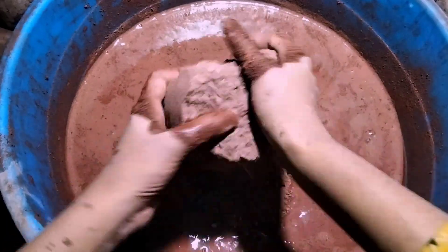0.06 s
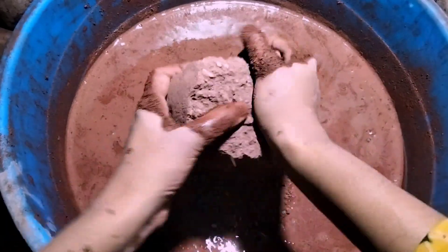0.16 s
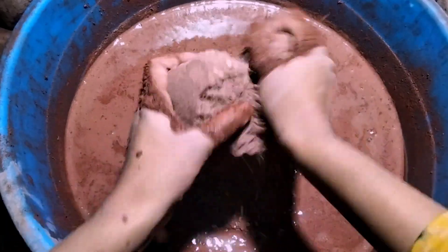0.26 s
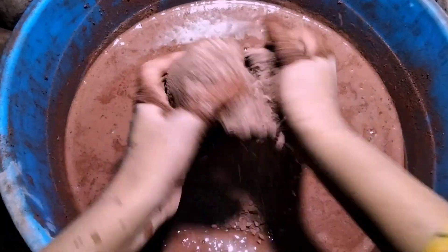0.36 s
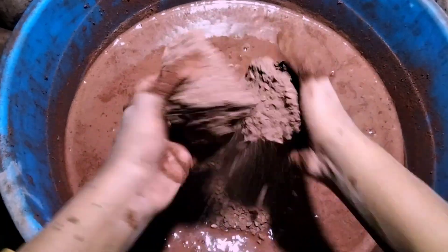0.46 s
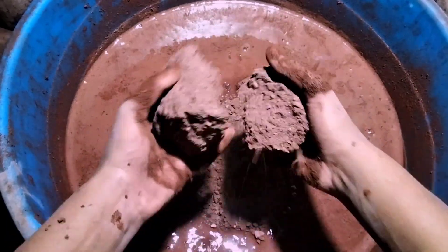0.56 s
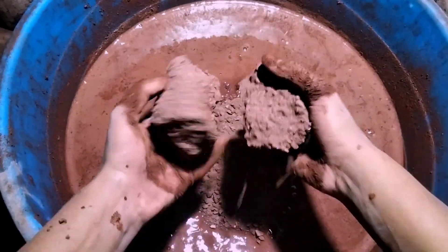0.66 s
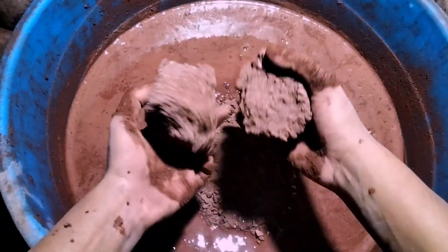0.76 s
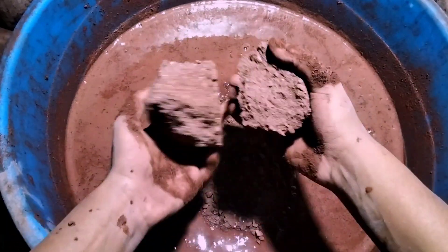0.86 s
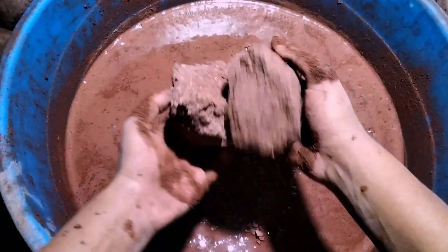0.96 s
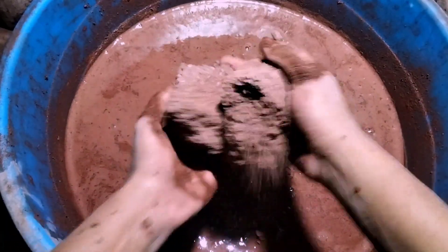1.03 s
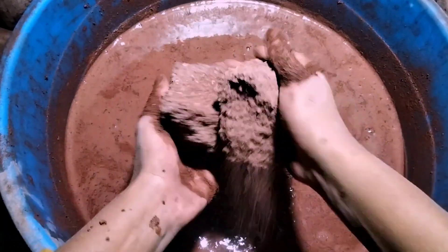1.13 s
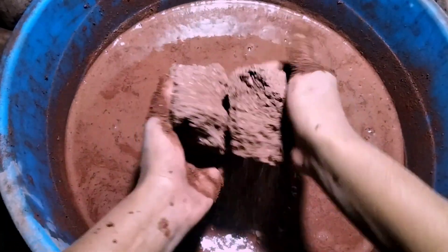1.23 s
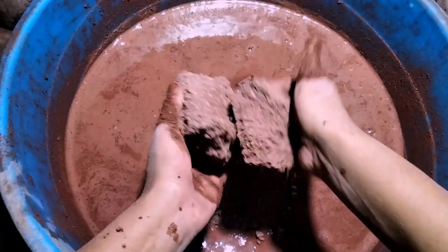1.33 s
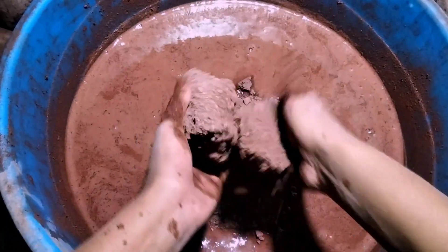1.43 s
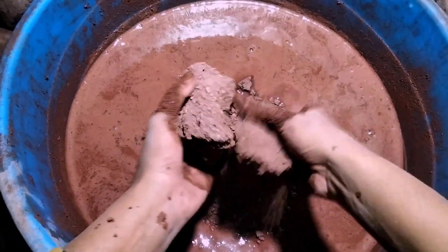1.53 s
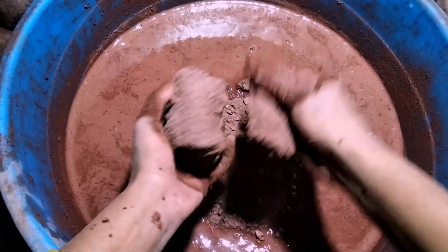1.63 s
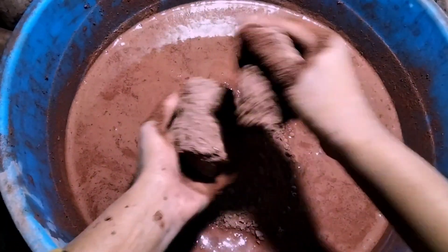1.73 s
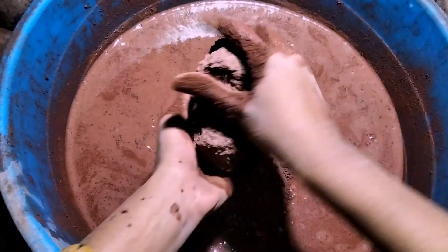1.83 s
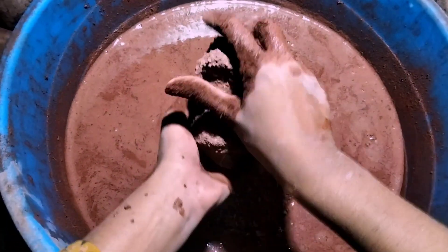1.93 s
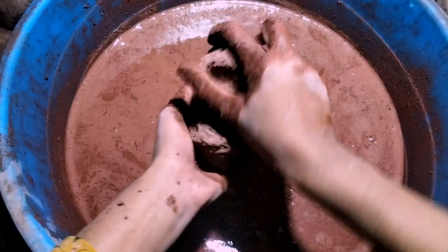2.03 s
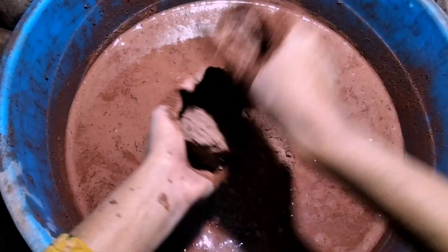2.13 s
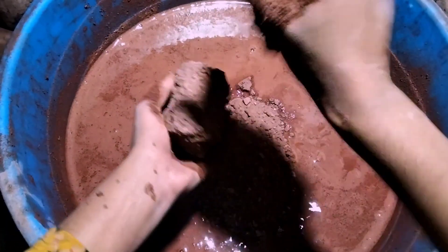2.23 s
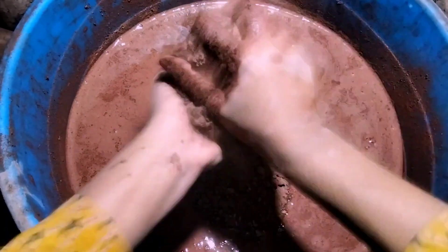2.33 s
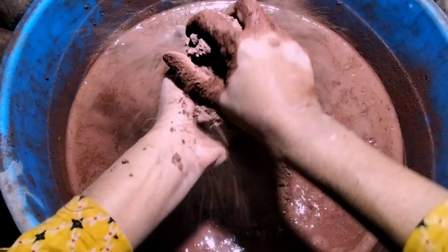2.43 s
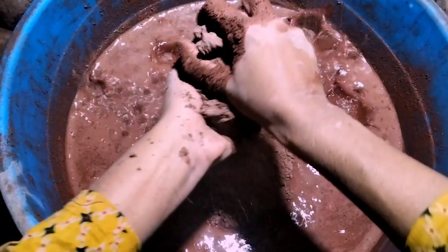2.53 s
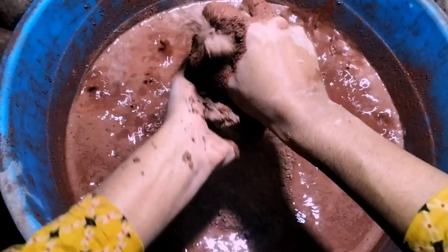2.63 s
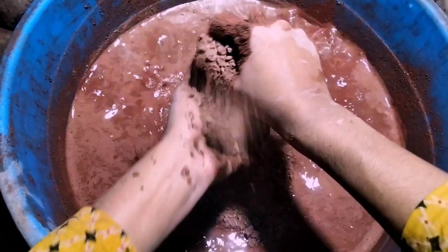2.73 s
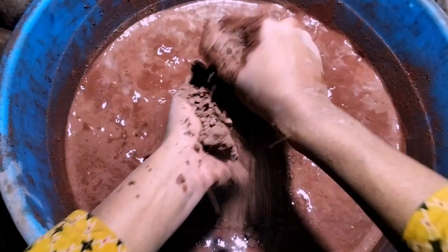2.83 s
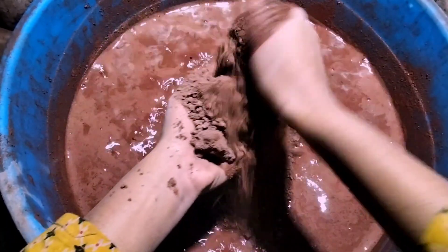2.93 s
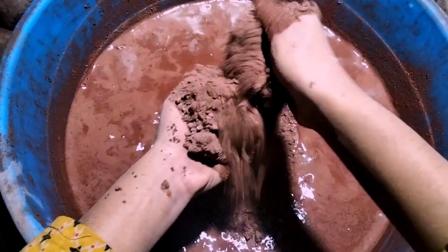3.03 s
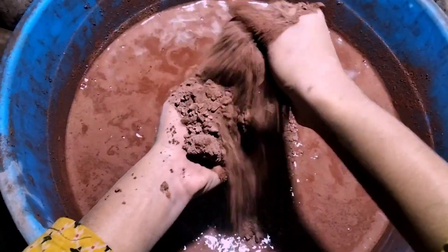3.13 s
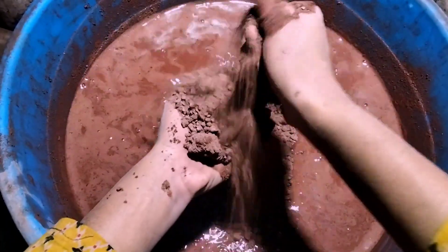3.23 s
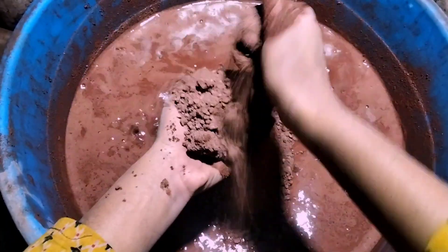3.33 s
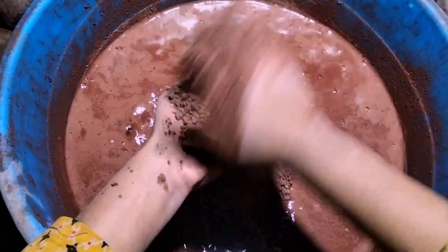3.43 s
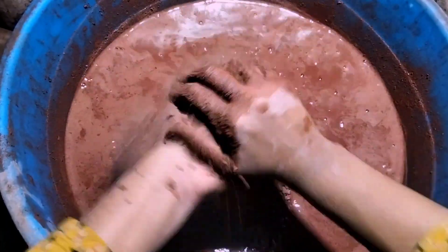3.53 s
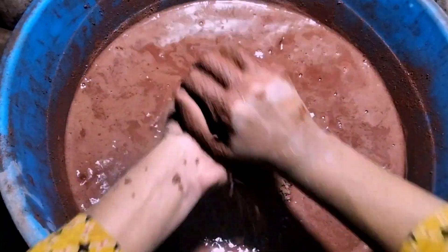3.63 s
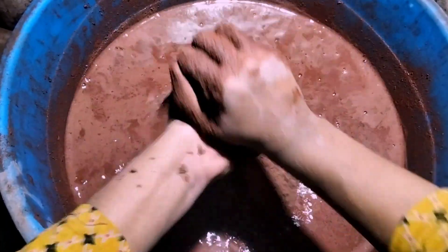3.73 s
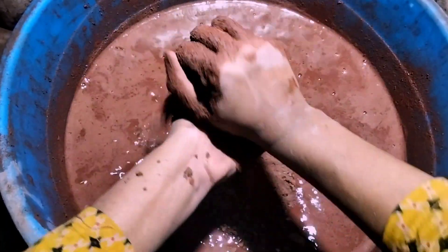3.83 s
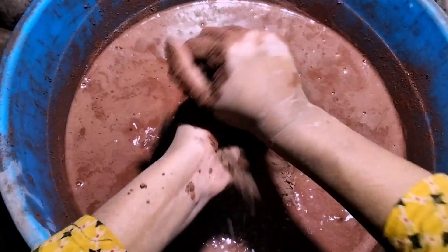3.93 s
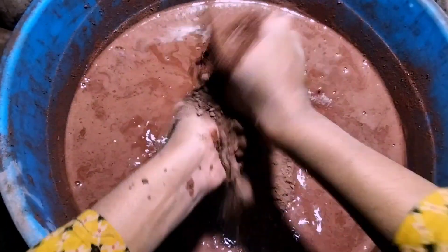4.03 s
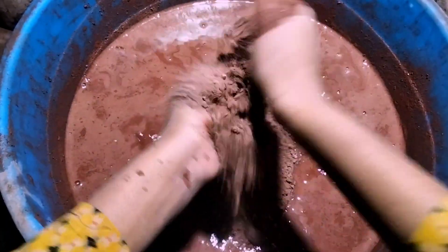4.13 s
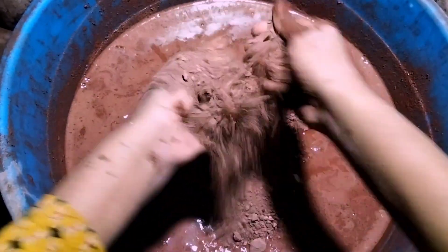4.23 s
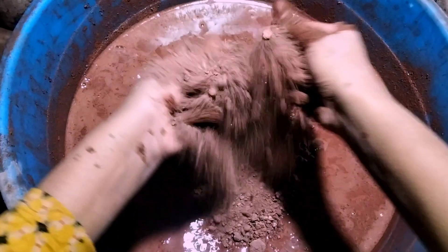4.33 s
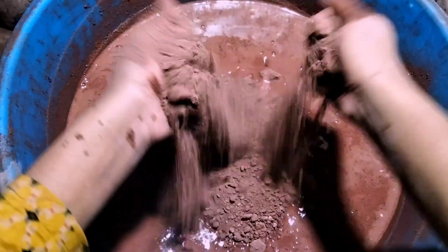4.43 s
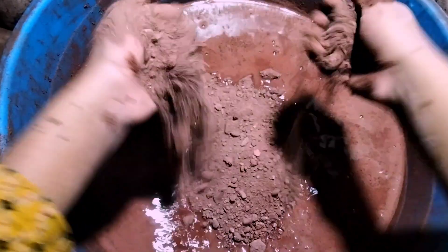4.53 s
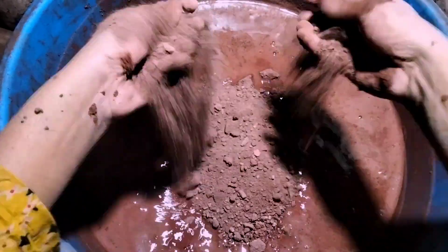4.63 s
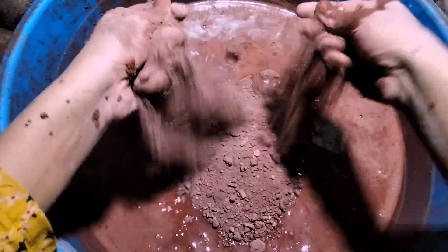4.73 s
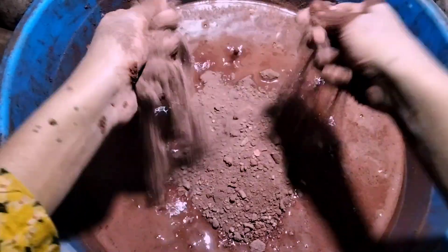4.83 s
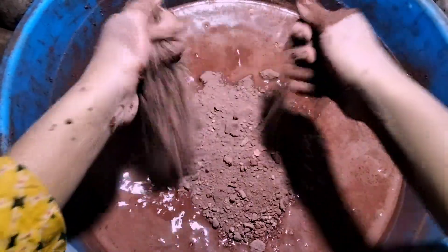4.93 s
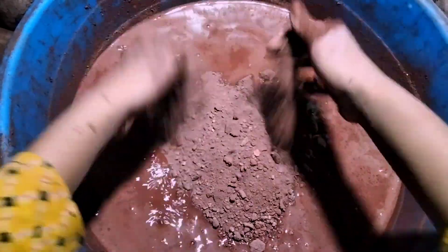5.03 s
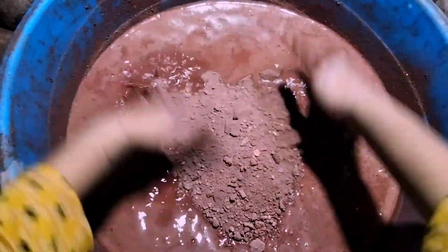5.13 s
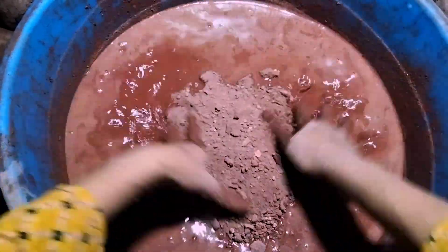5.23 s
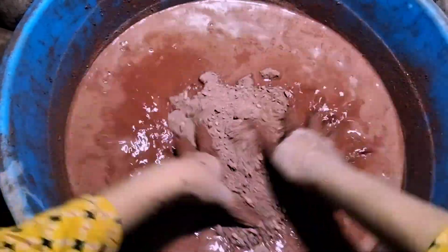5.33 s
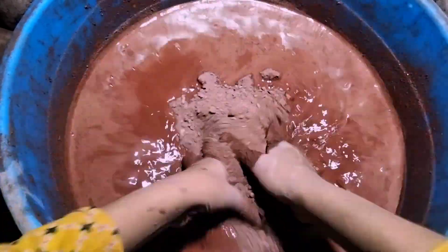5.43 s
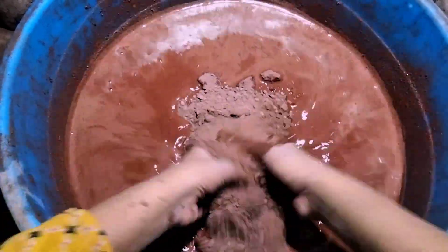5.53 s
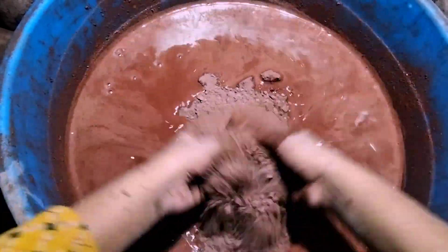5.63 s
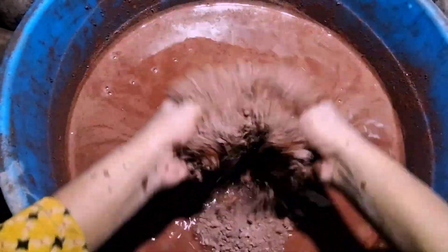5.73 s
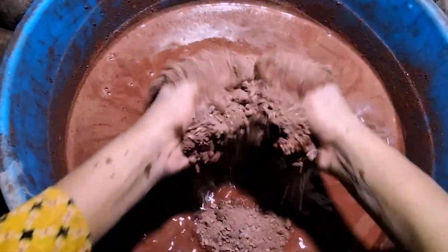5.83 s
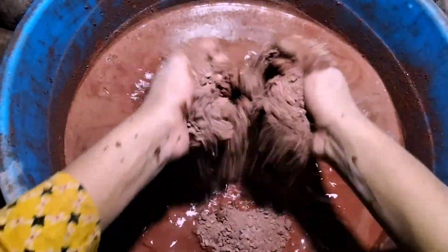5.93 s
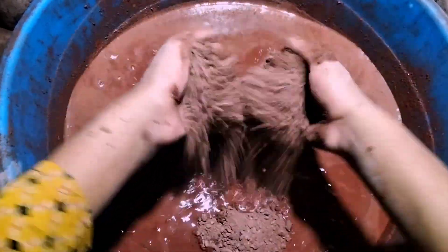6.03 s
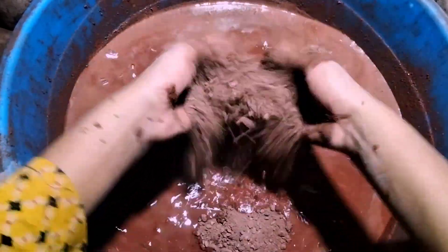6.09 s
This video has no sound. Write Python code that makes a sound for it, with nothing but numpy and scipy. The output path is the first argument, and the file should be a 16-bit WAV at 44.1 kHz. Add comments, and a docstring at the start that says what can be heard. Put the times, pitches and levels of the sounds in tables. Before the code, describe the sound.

A closely miked tub of muddy water. Quiet dry crunching of clods comes first, with grain clicks and light knocks. Around the middle, one hard knock and a loud cluster of snaps and splashes breaks out. Crackling turns brighter and busier as crumbs sprinkle and plop into water, followed by a gentle slosh, a brief falling hiss, and a swelling gritty pour.

```python
"""Crumbling damp dirt over a tub of water

Grains crackle as filtered random impulses; hard grains click, lumps crunch, and one clod thuds on another.
Pieces splash in as bursts of bubbles and spray; crumbs plop as single ringing air pockets.
Bubble swarms and wet grit slosh, and a scoop hisses with a falling note.
Tub resonances and echoes colour dirt and water; trickles, knocks and a low room rumble are added dry."""
import sys
import numpy as np
from scipy import signal
from scipy.io import wavfile

SR = 44100
rng = np.random.default_rng(int(sys.argv[2]) if len(sys.argv) > 2 else 0)


def output_pcm(signal):
    """Save a mono or channel-first signal as 16-bit PCM at the path in sys.argv[1].

    Samples are clipped to [-1, 1] before scaling.
    """
    pcm = np.clip(np.atleast_2d(signal).T, -1, 1) * 32767
    wavfile.write(sys.argv[1], SR, np.round(pcm).astype(np.int16))


N = 271656
TIME_S = np.arange(N) / SR
AFLOAT_S = 2.5  # from here on, crumbs fall into the water

# spectrum of grains showering the water, and of spray: freq_hz, relative level_db (per Hz)
GRIT_SPECTRUM = [(100, -15), (350, -12.5), (800, -28), (2000, -51), (3500, -22), (5000, -12.5), (7000, -8),
                 (8500, -0.5), (9600, 1.5), (11000, -9.5), (13000, -16.5), (15500, -29)]
# spectrum of a dull grain body or a water slap: freq_hz, relative level_db (per Hz)
BODY_SPECTRUM = [(200, -53), (900, -4.5), (2000, 4), (3300, 6), (5000, -3.5), (8000, -2), (16000, -100)]


def amp(db):
    """Converts dB to linear gain."""
    return 10 ** (np.asarray(db) / 20)


def unit(x):
    """Scales to an rms of one."""
    return x / np.sqrt(np.mean(x ** 2) + 1e-20)


def decay(t, t60_s):
    """Exponential decay, 60 dB down after t60_s."""
    return np.exp(-np.log(1000) * t / t60_s)


def add(mix, start_s, sound):
    """Adds a sound into the mix from start_s."""
    part = mix[max(round(start_s * SR), 0):][:len(sound)]
    part += sound[:len(part)]


def follow(table, axis=1):
    """Gain over time, interpolated in dB from one column of a table."""
    rows = np.array(table)
    return amp(np.interp(TIME_S, rows[:, 0], rows[:, axis]))


def click(spectrum, size=2048):
    """Minimum-phase click of the given spectrum, with a peak of one."""
    freq_hz, level_db = np.transpose(spectrum)
    bin_hz = abs(np.fft.fftfreq(size, 1 / SR))
    log_gain = np.log(amp(np.interp(np.log(bin_hz + 1), np.log(freq_hz), level_db)))
    # the Hilbert transform of log gain gives the minimum phase
    response = np.exp(np.conj(signal.hilbert(log_gain)))
    wave = np.fft.ifft(response).real[:size // 2]
    return wave / abs(wave).max()


def colour(x, spectrum):
    """Filters x to a spectrum."""
    return signal.oaconvolve(x, click(spectrum))[:len(x)]


def impacts(per_s, spread_db, size=N):
    """Random impulses of either sign, most small and a few large."""
    height = amp(spread_db * np.minimum(rng.exponential(1, size), 4))
    sign = rng.choice([-1, 1], size)
    return height * sign * (rng.random(size) < per_s / SR)


def bursts(texture, table, attack_s):
    """Cuts random pieces of a grainy texture into sudden, dying bursts."""
    out = np.zeros(N)
    for start_s, level_db, t60_s in table:
        t = np.arange(int(t60_s * SR) + 2) / SR
        shape = decay(t, t60_s) * (1 - np.exp(-t / attack_s))
        burst = texture[rng.integers(N // 2):][:len(t)] * shape
        # every burst gets the energy of its envelope
        add(out, start_s, amp(level_db) * burst * np.linalg.norm(shape) / np.linalg.norm(burst))
    return out


def grit():
    """Fine grains crackle in the palms, then more brightly over the water; coarse crumbs scrape lower."""
    # spectrum of grains rubbed in the palms: freq_hz, relative level_db (per Hz)
    rubbing_spectrum = [(100, -20), (350, -9), (800, -14), (2000, -28), (3500, -16), (5200, -12.5),
                        (7000, -6.5), (9500, 1), (11300, -4.5), (13000, -10), (15500, -16)]
    # spectrum of coarse crumbs scraping: freq_hz, relative level_db (per Hz)
    scrape_spectrum = [(90, -9.5), (350, 7.5), (800, -10), (2000, 2.5), (3400, -0.5), (5000, -4), (7000, 0),
                       (10000, -7.5), (15000, -23)]
    # loose dirt sliding between squeezes: time_s, fine_db, coarse_db
    slide = [(0.0, -57.5, -57.5), (.72, -57, -60.5), (1.4, -57, -56), (2.24, -63, -63), (2.42, -50.5, -52),
             (2.54, -47, -42), (3.05, -45.5, -49.5), (3.42, -45, -47.5), (3.85, -44.5, -42),
             (4.18, -44.5, -45), (4.92, -41.5, -47.5), (5.17, -47.5, -45), (5.26, -50, -56),
             (5.72, -44, -42), (5.97, -38, -39), (6.16, -35.5, -40)]

    afloat = np.clip((TIME_S - AFLOAT_S) / 0.02, 0, 1)
    grains = crackle(per_s=1500, spread_db=5.0, clump_db=2.0, clump_hz=109, sand_db=0)
    strays = chips(3240, 11200, per_s=420, cycles=9, spread_db=4.5)
    rubbed = unit(colour(grains + amp(-0.5) * strays, rubbing_spectrum))
    shower = unit(colour(grains + amp(-4.5) * strays, GRIT_SPECTRUM))
    fine = (1 - afloat) * rubbed + afloat * shower

    crumbs = crackle(per_s=2400, spread_db=3.5, clump_db=3.0, clump_hz=80, sand_db=-2.5)
    coarse = unit(colour(crumbs, scrape_spectrum))
    fine_gain = np.hypot(grip(), follow(slide))
    coarse_gain = np.hypot(grip(coarse=True), follow(slide, axis=2))
    return fine * fine_gain + coarse * coarse_gain


def crackle(per_s, spread_db, clump_db, clump_hz, sand_db):
    """Grains slip past each other in short clumps, over a whisper of fine sand."""
    lowpass = signal.butter(2, clump_hz, fs=SR, output="sos")
    clumps = unit(signal.sosfilt(lowpass, rng.standard_normal(N)))
    grains = impacts(per_s, spread_db) / np.sqrt(per_s / SR)
    sand = amp(sand_db) * rng.standard_normal(N)
    return unit((grains + sand) * amp(clump_db * clumps))


def chips(low_hz, high_hz, per_s, cycles, spread_db, count=24):
    """Loose grains of many sizes: each clicks for a few cycles at its own pitch."""
    out, t = np.zeros(N), np.arange(SR // 200) / SR
    for pitch_hz in np.geomspace(low_hz, high_hz, count):
        ring = np.sin(2 * np.pi * pitch_hz * t) * decay(t, cycles / pitch_hz)
        out += signal.oaconvolve(impacts(per_s / count, spread_db), ring / np.linalg.norm(ring))[:N]
    return unit(out)


def grip(coarse=False):
    """Gain over time of the finger squeezes, and of one burst of spray: each closes quickly, holds, and its
    grains soon settle."""
    # fingers squeezing or rubbing, and at 2.442 s the spray of pieces splashing in: start_s, length_s,
    # crackle_db, coarse_db (relative to crackle)
    squeezes = [(0.0, 0.058, -50, 4.5), (0.095, 0.12, -49, 2), (0.33, 0.1, -53.5, -1.5),
                (0.441, 0.096, -49, -3), (0.567, 0.036, -49.5, -1), (0.892, 0.087, -53.5, 0.5),
                (1.11, 0.12, -53.5, -10), (1.32, 0.13, -52.5, -3.5), (1.575, 0.11, -58, -3),
                (1.767, 0.032, -44, -0.5), (1.889, 0.14, -56, -2), (2.312, 0.011, -48.5, 9.5),
                (2.385, 0.057, -55, -12), (2.442, 0.075, -38, 6), (2.64, 0.079, -46.5, 5.5),
                (2.79, 0.097, -48, 3), (2.925, 0.022, -45, 3), (3.122, 0.16, -43.5, -5.5),
                (3.526, 0.2, -47.5, 3), (3.99, 0.039, -43, -4), (4.34, .145, -45, -3),
                (4.581, 0.067, -48.5, 5), (4.708, 0.16, -42, -2.5), (4.995, 0.09, -41, -0.5),
                (6.01, 0.054, -42, -3)]
    attack_s, release_s = 0.013, 0.012
    out = np.zeros(N)
    for start_s, length_s, crackle_db, coarse_db in squeezes:
        t = np.arange(int((length_s + 8 * release_s) * SR)) / SR
        rise = np.minimum(t / attack_s, 1)
        fall = np.exp(-np.maximum(t - length_s, 0) / release_s)
        add(out, start_s, amp(crackle_db + coarse * coarse_db) * rise * fall)
    return out


def ticks():
    """A hard grain gives a bright tip over a duller body, and scatters a little dust."""
    # single grains snapping or landing: start_s, level_db, body_db (relative, before the trim)
    hard_grains = [(0.105, -16.5, -17), (0.3269, -26, -14), (0.3627, -17.5, -6), (0.3697, -25, -8),
                   (0.4477, -25, -4), (0.5085, -21, -9), (0.8415, -29, -5), (0.934, -19.5, -12),
                   (1.109, -30.5, 0), (1.2177, -17, -5), (1.2203, -27, -15), (1.253, -29, -2),
                   (1.77, -19, 4.5), (1.917, -24.5, -13), (2.1549, -19, -9.5), (2.188, -30, -10),
                   (2.4394, -12, 1), (2.4474, 0, -2), (2.4535, -8, -10), (2.4721, -2, 4.5),
                   (2.4886, -12, 4), (2.5122, -9, 9), (2.7635, -13, 10), (2.8166, -2.5, -2),
                   (2.8494, -7.5, -1.5), (2.8954, -14.5, 3.5), (2.928, -13, -1.5), (3.1201, -14, -7),
                   (3.141, -15.5, 3), (3.1733, -18.5, -16), (3.2312, -18.5, -16), (3.3249, -20.5, 1.5),
                   (3.5705, -14.5, -8), (3.5773, -15, -19), (3.6281, -16, -3), (3.688, -19, -17),
                   (4.0109, -8, -8), (4.0207, -14, -4), (4.1741, -20, 4), (4.205, -16.5, -6),
                   (4.3502, -15, -4), (4.4579, -12.5, -12), (4.469, -11, -22), (4.484, -8, -2.5),
                   (4.627, -12.5, -2), (4.6329, -14.5, 1), (4.7093, -13, -9), (4.7743, -17, -1.5),
                   (4.826, -19, -13), (4.8367, -21.5, -3), (4.949, -17.5, -21), (5.0563, -16.5, -4),
                   (5.6852, -17, -26), (6.0677, -14, -11)]
    # spectrum of the bright tip: freq_hz, relative level_db (per Hz)
    tip_spectrum = [(300, -63), (3000, -77), (5000, -24.5), (7000, -8.5), (9500, 0), (11000, -10),
                    (13000, -24), (16000, -23)]
    body_trim_db = -2.5
    out, tip, body = np.zeros(N), click(tip_spectrum), click(BODY_SPECTRUM)
    t = np.arange(len(tip)) / SR
    for start_s, level_db, body_db in hard_grains:
        scatter = 0.25 * rng.standard_normal(len(t)) * np.exp(-t / 0.00073)
        scatter[0] = 1  # the grain itself, ahead of its dust
        strike = tip + amp(body_db + body_trim_db) * body
        add(out, start_s, amp(level_db) * np.convolve(strike, scatter / np.linalg.norm(scatter)))
    return out


def crunches():
    """A lump fractures in a quick run of grain snaps."""
    # lumps giving way: start_s, level_db, t60_s
    fractures = [(.005, -36, .03), (0.177, -36.5, 0.021), (.318, -40, 0.046), (0.472, -39, 0.057),
                 (0.931, -39.5, 0.031), (0.998, -37.5, 0.03), (1.212, -38.5, 0.047), (1.474, -39, 0.023),
                 (1.767, -30, 0.05), (1.78, -41, 0.059), (2.059, -40.5, 0.044), (2.3194, -11, 0.01),
                 (2.331, -32.5, 0.042), (2.4183, -33, 0.0076), (2.899, -25, 0.0038), (3.713, -30.5, 0.11),
                 (4.006, -26.5, 0.047), (4.4423, -28, .015), (4.9328, -29, 0.0073)]
    # spectrum of the snaps: freq_hz, relative level_db (per Hz)
    crumble_spectrum = [(80, 1), (400, 5), (800, 1), (2300, 1.5), (3500, -2), (5000, 1), (9000, -1),
                        (11500, -2), (16000, -35)]
    snaps = impacts(per_s=9000, spread_db=1.5)
    return bursts(colour(snaps, crumble_spectrum), fractures, attack_s=0.00018)


def knocks():
    """Clod on clod thuds and rings briefly; the lumps are too small to radiate deep bass."""
    # modes of the damp clods and cupped hand: freq_hz, level_db, t60_s
    modes = [(368, 1, 0.022), (307, -22.5, 0.14), (336, -23, 0.17), (211, -27.5, 0.091), (557, -24, 0.07),
             (975, -15, 0.021), (2120, -6.5, 0.0075), (2430, -10.5, 0.011)]
    # clods bumping in the palms: start_s, level_db
    bumps = [(0.177, -34), (0.46, -31.5), (1.218, -33.5), (1.768, -39), (2.06, -35.5), (2.3192, 2),
             (4.0085, -26.5)]
    out, t = np.zeros(N), np.arange(SR // 3) / SR
    thud = sum(amp(level_db) * decay(t, t60_s) * np.sin(2 * np.pi * freq_hz * t)
               for freq_hz, level_db, t60_s in modes)
    thud = thud * (1 - np.exp(-t / 0.00075))  # soft onset
    for start_s, level_db in bumps:
        add(out, start_s, amp(level_db) * thud)
    return signal.sosfilt(signal.butter(3, 125, "high", fs=SR, output="sos"), out)


def splashes():
    """Each clod or crumb hitting the water throws a burst of bubbles and spray."""
    # water hits: start_s, level_db, t60_s
    hits = [(2.443, -14.5, 0.069), (2.456, -18.5, 0.06), (2.4718, -11, 0.062), (2.482, -13.5, 0.11),
            (2.495, -14.5, 0.04), (2.512, -30, 0.04), (2.521, -32, 0.061), (2.57, -29.5, 0.062),
            (2.763, -15, 0.019), (2.7869, -18, 0.02), (2.816, -18, 0.022), (2.849, -21, 0.04),
            (2.894, -36, 0.017), (2.946, -17, 0.023), (3.142, -36.5, 0.12), (4.485, -27, 0.022),
            (4.618, -39, 0.13), (4.728, -36, 0.066), (5.038, -31, 0.038), (5.081, -32, 0.055),
            (5.52, -34.5, 0.36), (5.772, -33, 0.23)]
    # spectrum of the froth: freq_hz, relative level_db (per Hz)
    fizz_spectrum = [(250, -24), (550, -7), (780, -11.5), (1100, 3), (2200, 4), (3300, 3.5), (4800, -1),
                     (9000, 20), (15000, -31)]
    swarm = bubbles(432, 4200, per_s=2600, cycles=4.9, spread_db=4.0, count=48)
    froth = unit(colour(swarm, fizz_spectrum))
    spray = unit(colour(impacts(per_s=4400, spread_db=2.0), GRIT_SPECTRUM))
    return bursts(froth + amp(-14.5) * spray, hits, attack_s=0.00099)


def plops():
    """A crumb slaps the surface and its air pocket rings; the harder the slap, the shorter the ring."""
    # single air pockets: start_s, level_db, pitch_hz (at onset), t60_s
    pockets = [(0.0326, -22.5, 2070, 0.0075), (0.368, -36.5, 1050, 0.022), (0.72, -29.5, 3540, 0.0058),
               (2.4421, -17, 776, 0.0089), (2.457, -6, 1830, .009), (2.48, -18, 1260, 0.014),
               (2.479, -3, 2920, 0.0071), (2.4882, -1, 1054, .021), (2.491, -17, 840, 0.0094),
               (2.504, -15, 3000, 0.0079), (2.513, -7.5, 1084, 0.018), (2.5123, 4, 2270, 0.0049),
               (2.577, -22.5, 1690, 0.028), (2.7643, -23, 1050, .009), (2.789, -25, 333, 0.041),
               (2.8159, -20, 940, 0.021), (2.8501, -13.5, 470, 0.0088), (2.928, -27, 3580, .01),
               (2.9715, -30, 3700, 0.011), (3.1407, -17, 2370, 0.0078), (3.183, -28, 2460, .015),
               (3.198, -21.5, 1250, 0.023), (3.33, -23, 2280, 0.011), (3.597, -16.5, 3020, 0.0081),
               (3.6151, -13.5, 2820, .0052), (3.63, -13.5, 1000, 0.0088), (4.0485, -17.5, 3170, 0.005),
               (4.1765, -26, 1420, 0.016), (4.228, -20, 3940, 0.0047), (4.3027, -22, 1680, 0.008),
               (4.351, -25.5, 1810, 0.023), (4.453, -18, 1380, 0.0051), (4.5117, -17, 1540, 0.0047),
               (4.539, -27, 1110, 0.018), (4.59, -14.5, 1590, 0.0066), (4.6208, -19, 3650, 0.0085),
               (4.6336, -24, 950, 0.021), (4.725, -16, 1880, 0.0073), (4.906, -15, 1260, 0.0045),
               (4.9321, -9, 2200, 0.0033), (4.9852, -22, 1140, 0.018), (5.041, -22, 1520, 0.021),
               (5.067, -25, 1170, 0.046), (5.199, -30, 625, 0.018), (5.2203, -17, 460, .026),
               (5.238, -24, 1720, 0.013), (5.2535, -27.5, 440, 0.048), (5.9415, -26.5, 650, 0.014),
               (6.063, -25.5, 2800, .014), (6.122, -25.5, 1060, .02)]
    out, slap = np.zeros(N), click(BODY_SPECTRUM)
    for start_s, level_db, pitch_hz, t60_s in pockets:
        add(out, start_s, amp(level_db + 0.5) * np.exp(-t60_s / 0.006) * slap)
        add(out, start_s, amp(level_db) * bubble(pitch_hz, t60_s))
    return out


def bubble(pitch_hz, t60_s, rise=0.086, attack_s=0.0004):
    """A ringing air pocket; its pitch climbs as it nears the surface."""
    t = np.arange(int(t60_s * SR) + 2) / SR
    tone = np.sin(2 * np.pi * pitch_hz * t * (1 + rise * t / t60_s))
    return tone * decay(t, t60_s) * (1 - np.exp(-t / attack_s))


def bubbles(low_hz, high_hz, per_s, cycles, spread_db, count=36):
    """A steady swarm of bubbles of many sizes."""
    out = np.zeros(N)
    for pitch_hz in np.geomspace(low_hz, high_hz, count) * rng.uniform(0.96, 1.04, count):
        ring = bubble(pitch_hz, cycles / pitch_hz * 2 ** rng.uniform(-1, 1))
        out += signal.oaconvolve(impacts(per_s / count, spread_db), ring)[:N] * np.sqrt(pitch_hz)
    return unit(out)


def slosh():
    """Dirt moving in water: bubble swarms, a patter of separate drops, and a thick wash of wet grit."""
    # spectrum of swarm and wash: freq_hz, relative level_db (per Hz)
    slosh_spectrum = [(200, -5), (350, -3.5), (550, -1.5), (850, -2.5), (1300, -1), (2100, 1), (3200, -5),
                      (4200, -15), (6000, -24), (15000, -19)]
    # hands and sinking dirt stirring the water: time_s, stir_db
    stir = [(2.53, -49), (2.8, -42.5), (3.03, -48), (3.42, -48.5), (3.83, -39.5), (4.1, -45.5),
            (4.55, -50.5), (4.92, -49.5), (5.16, -46.5), (5.22, -37.5), (5.42, -36), (5.8, -40.5),
            (6.16, -48.5)]
    spill_db = -5  # crumbs that a squeeze drops in, relative to its crackle
    afloat = np.clip((TIME_S - AFLOAT_S) / 0.022, 0, 1)
    swarm = bubbles(339, 4460, per_s=2400, cycles=7, spread_db=2.5, count=48)
    swarm = unit(colour(swarm, slosh_spectrum))
    patter = bubbles(970, 3570, per_s=170, cycles=10.6, spread_db=3.5, count=20)
    lumps = crackle(per_s=3000, spread_db=2.5, clump_db=2.3, clump_hz=50, sand_db=-2.5)
    wash = unit(colour(lumps, slosh_spectrum))
    water = amp(-5.5) * swarm + amp(-10.5) * patter + amp(-4.5) * wash
    return afloat * water * np.hypot(follow(stir), amp(spill_db) * grip())


def scoop(width_hz=380):
    """Wet grit hisses through a hollow whose note falls as the hands open it."""
    # hollow between the scooping hands: time_s, resonance_hz, level_db
    hollow = [(5.48, 3900, -62), (5.56, 3700, -52), (5.68, 3400, -48), (5.79, 2900, -54), (5.92, 2900, -66)]
    time_s, resonance_hz, _ = np.transpose(hollow)
    turn = np.exp(2j * np.pi * np.cumsum(np.interp(TIME_S, time_s, resonance_hz)) / SR)
    # shift the note to zero Hz, lowpass, shift back: a gliding bandpass
    lowpass = signal.butter(2, width_hz / 2, fs=SR, output="sos")
    smooth = signal.sosfilt(lowpass, impacts(per_s=5900, spread_db=1.0) / turn)
    active = (TIME_S > time_s[0]) * (TIME_S < time_s[-1])
    return unit((smooth * turn).real) * follow(hollow, axis=2) * active


def trickles(width_hz=45):
    """Dirt streaming onto or through water: noise keeps one hollow resonance sounding."""
    # streams: start_s, length_s, level_db, resonance_hz
    streams = [(1.888, 0.085, -50.5, 562), (2.25, 0.093, -44.5, 556), (4.438, 0.058, -41, 652),
               (5.291, .25, -41.5, 654)]
    out = np.zeros(N)
    for start_s, length_s, level_db, resonance_hz in streams:
        b, a = signal.iirpeak(resonance_hz, resonance_hz / width_hz, SR)
        note = signal.lfilter(b, a, rng.standard_normal(SR // 2))[-int(length_s * SR):]
        fade = signal.windows.tukey(len(note), 0.6)
        add(out, start_s, amp(level_db) * unit(note) * fade)
    return out


def tub(x):
    """The tub's resonances, quick echoes off its wall, and a faint short tail from the surroundings."""
    # tub and its air: freq_hz, width_hz, relative gain_db
    resonances = [(344, 20, -5.5), (613.5, 95, 1), (922, 130, -17.5), (1210, 30, -13), (1495, 32, -18.5),
                  (1757, 17, -19.5)]
    ring = sum(amp(gain_db) * signal.lfilter(*signal.iirpeak(freq_hz, freq_hz / width_hz, SR), x)
               for freq_hz, width_hz, gain_db in resonances)
    t = np.arange(SR // 4) / SR
    taps = rng.standard_normal(len(t)) * (t > 0.002)
    wall, tail = taps * np.exp(-t / 0.0037), taps * np.exp(-t / 0.013)
    echoes = amp(-10.5) * wall / np.linalg.norm(wall) + amp(-33.0) * tail / np.linalg.norm(tail)
    return amp(-1.5) * (x + amp(2.5) * ring + signal.oaconvolve(x, echoes)[:N])


def room():
    """A steady low rumble with faint hiss, from filtered noise."""
    # background spectrum: freq_hz, relative level_db (per Hz)
    room_spectrum = [(20, -34), (45, -12), (80, -1), (130, 1), (220, -4.5), (400, -10), (800, -20),
                     (2000, -29.5), (5000, -45), (9500, -38), (15000, -33)]
    return amp(-50) * unit(colour(rng.standard_normal(N), room_spectrum))


def scene():
    """Dirt and water sound through the tub, the rest directly; both channels are the same."""
    dirt = grit() + ticks() + crunches()
    water = slosh() + scoop() + splashes() + plops()
    mono = tub(dirt + water) + trickles() + knocks() + room()
    return np.array([mono, mono])


def record(dry):
    """The microphone sheds the deepest bass, the loudest peaks clip; then the band limit."""
    edge_hz = 15750
    lean = signal.sosfilt(signal.butter(1, 30, "high", fs=SR, output="sos"), dry)
    edge = signal.firwin(255, edge_hz, window=("kaiser", 8), fs=SR)
    return signal.oaconvolve(np.clip(lean, -1, 1), edge[None], "same")


dry = scene()
out = record(dry)
output_pcm(out)
```